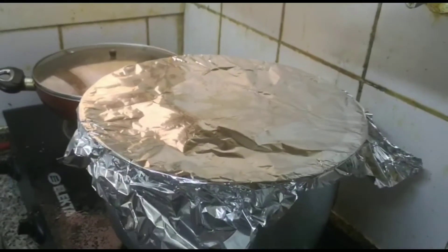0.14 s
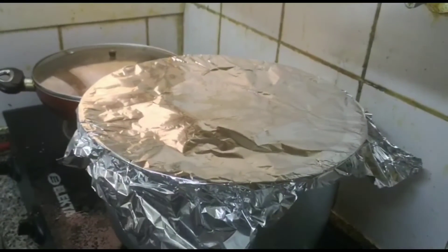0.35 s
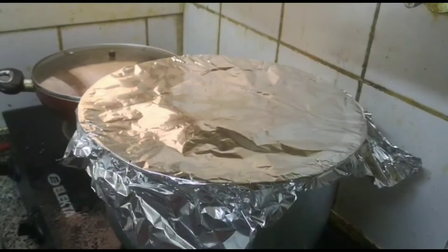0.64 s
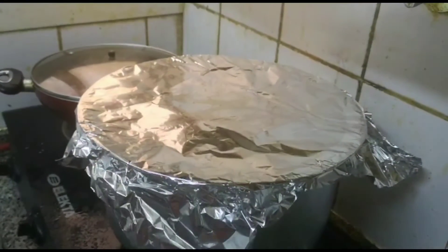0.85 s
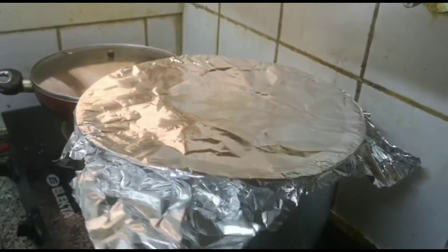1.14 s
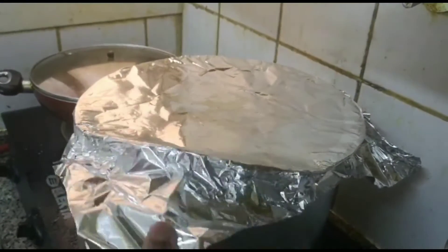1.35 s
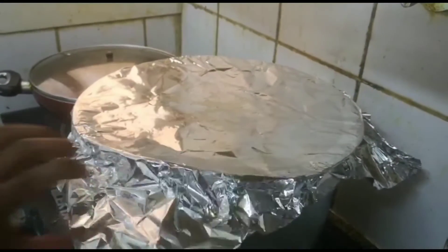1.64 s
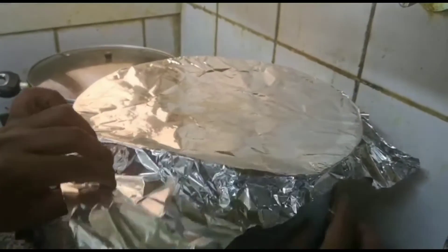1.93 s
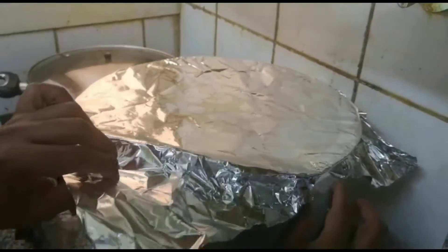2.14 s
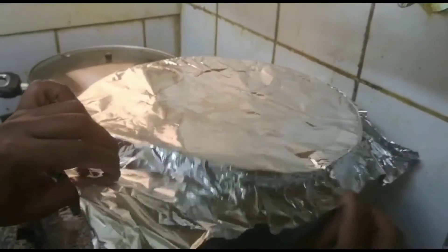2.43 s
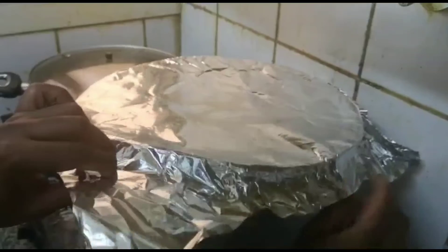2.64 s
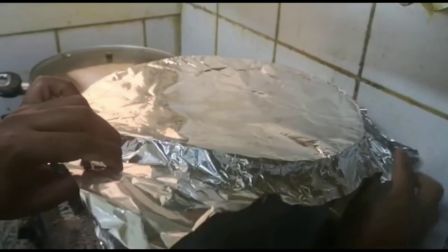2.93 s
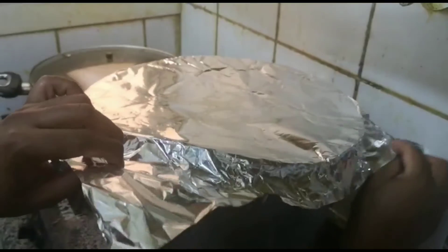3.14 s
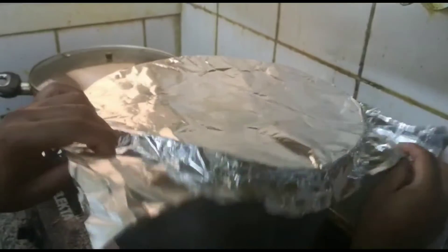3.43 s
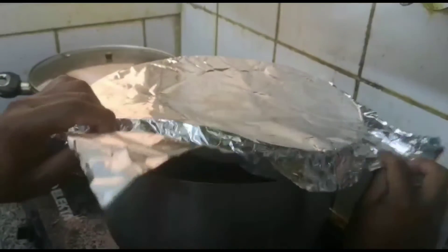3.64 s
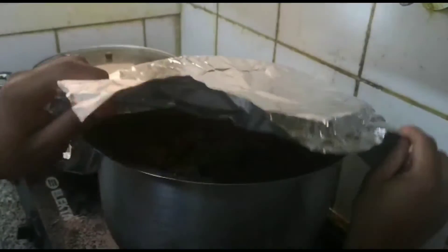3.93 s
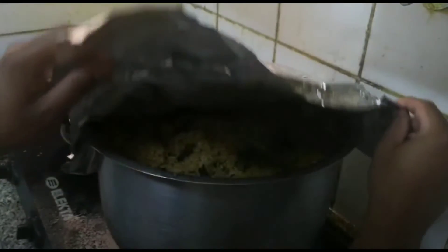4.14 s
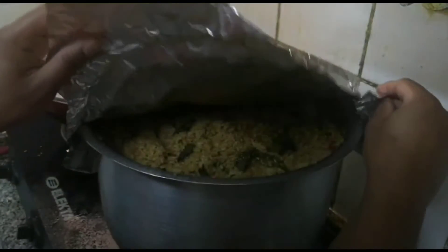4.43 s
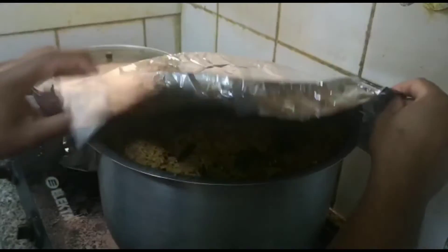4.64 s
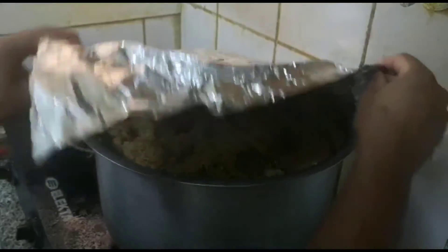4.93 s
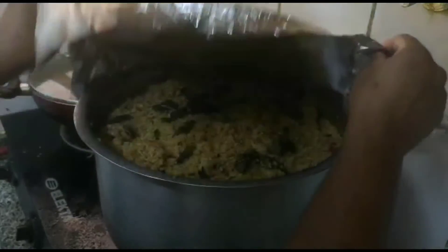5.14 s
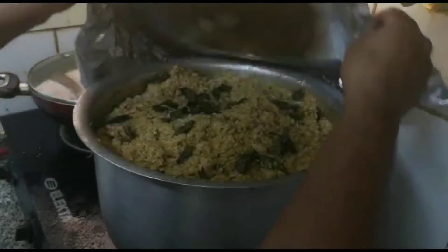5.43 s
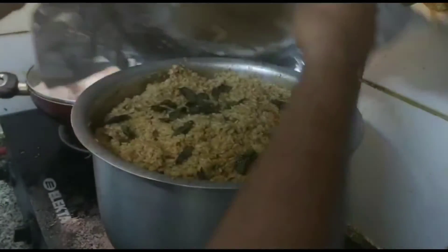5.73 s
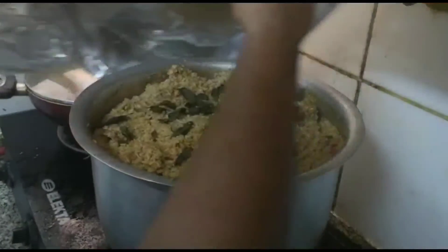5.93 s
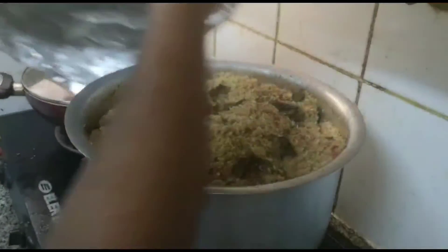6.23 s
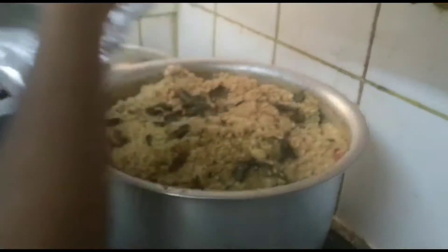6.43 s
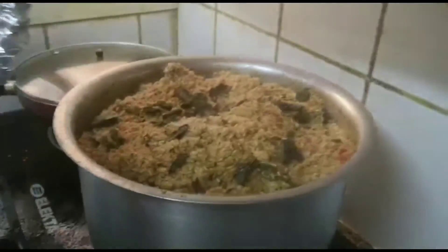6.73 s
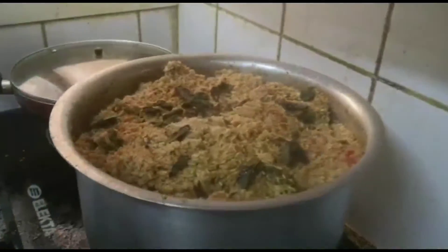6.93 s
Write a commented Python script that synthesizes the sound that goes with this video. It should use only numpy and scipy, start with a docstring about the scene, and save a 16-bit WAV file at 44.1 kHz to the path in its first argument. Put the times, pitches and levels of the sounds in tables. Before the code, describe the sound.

For the first second there is mostly background: a low pulsing engine drone heard through walls, soft rumble, steady faint hiss and a barely noticeable thin whine, with two tiny ticks near 0.2 and 0.5. At about 1.05 foil is grabbed with a sudden bright crackle, busy until 1.5, then short crinkles near 1.7. From 1.9 to 2.5 lighter tugs give small snaps, with a stronger burst at 2.6-2.8. After a near pause, dense, louder peeling runs from 3.2 to 4.1, with sharp cracks and tinny panel pops, strongest around 3.4. Finer rustling continues to 4.8, then more buckles and snaps from 4.9 to 6. Around 6.05-6.25 the freed sheet rattles hollowly. Sparse crinkles fade by 6.7, leaving drone and hiss to 7. Close stereo, leaning slightly left, brief tiled-room echo.

```python
"""Aluminium foil is peeled off a cooking pot in a tiled kitchen: creases crackle, the sheet buckles and snaps.
The foil is made of thousands of short dying tones, noisy cracks with ringing panels, and a late loose rattle;
echoes from the tiled walls are added to it. A slow engine drones through the walls: a stack of tones on its
firing rate. A thin whine, three wavering tones, and noise shaped into rumble and room hiss lie beneath."""
import sys
import numpy as np
from scipy import signal
from scipy.fft import rfft, irfft, next_fast_len
from scipy.io import wavfile
from scipy.ndimage import map_coordinates

SR = 44100
rng = np.random.default_rng(int(sys.argv[2]) if len(sys.argv) > 2 else 0)


def nominal_scale(level):
    """Amplitude ratio for a level in decibels (scalar or array-like)."""
    x = np.asarray(level, float) / 20
    return 10 ** x


def unload_wav(signal):
    """Save mono or channel-first audio to the path in sys.argv[1] as 16-bit WAV at rate SR, clipped to [-1, 1]."""
    wavfile.write(
        sys.argv[1],
        SR,
        np.round(np.clip(np.atleast_2d(signal).T, -1, 1) * 32767).astype(np.int16),
    )


N = 311787  # samples in the scene


def unit(x):
    """Scaled to rms 1."""
    return x / np.sqrt(np.mean(x ** 2) + 1e-20)


def along(points, hz):
    """Reads a curve of (frequency, value) points, with straight lines on a log frequency axis."""
    f, v = np.transpose(points)
    return np.interp(np.log(hz + 1), np.log(f + 1), v)


def wobble(rate):
    """A smooth random curve, with this many random points a second."""
    points = rng.standard_normal(int(N * rate / SR) + 4)
    return map_coordinates(points, [np.arange(N) * rate / SR])


def filtered(x, response):
    """Makes each frequency louder or softer, as the response function says."""
    m = next_fast_len(N + 8192)
    return irfft(rfft(x, m) * response(np.fft.rfftfreq(m, 1 / SR)), m)[..., :N]


# How alike noise is at left and right: (frequency [Hz], likeness [1 = the same, 0 = unrelated])
LIKENESS = [(45, 0.999), (85, 0.9), (150, 0.96), (380, 0.6), (620, 0.05), (2380, 0.0), (5980, -0.01),
            (15000, -0.01)]


def rush(spectrum):
    """Stereo noise of rms 1, alike in the bass and unrelated in the treble."""
    def response(hz):
        turn = np.arccos(np.clip(along(LIKENESS, hz), -1, 1)) / 2
        return nominal_scale(along(spectrum, hz)) * [np.cos(turn), np.sin(turn)]

    mid, side = filtered(rng.standard_normal((2, N)), response)
    return unit(np.array([mid + side, mid - side]))


def grains(spectrum, lo_hz, hi_hz, cycles, spread_db, count, size, channels):
    """Dying tones of random time, pitch and strength, dealt out over several spots; the spots sum to rms 1."""
    u = rng.random((count, 4))
    hz = lo_hz * (hi_hz / lo_hz) ** u[:, 1:2]
    turns = hz * np.arange(size) / SR
    shape = np.sin(2 * np.pi * turns) * np.exp(-turns / cycles)
    # higher grains are shorter, so they are made larger: a flat sum
    gain = hz * nominal_scale(spread_db * np.minimum(-np.log(1 - u[:, 2:3]), 4.5))
    spot = (u[:, 3:] * channels).astype(int)
    start = (u[:, :1] * N).astype(int) + spot * (N + size)
    places = start + np.arange(size)
    spots = np.bincount(places.ravel(), (gain * shape).ravel(), channels * (N + size))
    spots = filtered(spots.reshape(channels, -1)[:, :N], lambda f: nominal_scale(along(spectrum, f)))
    return spots / np.sqrt(np.mean(spots.sum(0) ** 2))


def breath_db():
    """A slow, small rise and fall in level."""
    return 0.7 * wobble(2)


# Engine tones, one for each multiple of the firing rate from the first up: (level among them [dB])
ENGINE_TONES = [-4, -20, -5, -0.5, -8, -12, 1.5, -9, -17, -14, -18, -21, -15, -16, -18, -16, -17, -24, -25,
                -25, -17]


def engine():
    """Steady multiples of the engine's firing rate, each breathing a little."""
    firing_hz, shift_db = 12.168, -37
    t = np.arange(N) / SR
    drone = np.zeros(N)
    for multiple, db in enumerate(ENGINE_TONES, 1):
        turns = multiple * firing_hz * t + rng.random()
        drone += nominal_scale(db + shift_db + breath_db()) * np.sin(2 * np.pi * turns)
    return drone


def whine():
    """One faint, thin tone whose level and phase waver."""
    hz, usual_db = 1038, -64  # level is rms
    phase = 2 * np.pi * hz * np.arange(N) / SR + wobble(10)
    return np.sqrt(2) * nominal_scale(usual_db + 4 * breath_db()) * np.sin(phase)


# Unsteady tones: (usual pitch [Hz])
WAVER_PITCHES = [45, 100, 164]
# Their swells, before a small random wobble:
# (time [s], first tone level [dB rms], second tone level [dB rms], third tone level [dB rms])
WAVER_SWELLS = [(0.1, -38.5, -47, -57), (1.3, -42, -53, -46), (1.6, -54, -43.5, -63.5),
                (5.61, -38.5, -49, -53), (6.3, -37, -47, -43), (7.07, -39, -40, -55.5)]


def wavering():
    """Tones that swell and fade and drift slightly in pitch."""
    s, *levels = np.transpose(WAVER_SWELLS)
    total = np.zeros(N)
    for hz, db in zip(WAVER_PITCHES, levels):
        turns = np.cumsum(hz * (1 + 0.0042 * wobble(6))) / SR
        swell = nominal_scale(np.interp(np.arange(N) / SR, s, db) + 1.4 * wobble(6.5))
        total += np.sqrt(2) * swell * np.sin(2 * np.pi * turns)
    return total


# Colour of the rumble: (frequency [Hz], relative level per Hz [dB])
RUMBLE_COLOUR = [(8, -37), (14, 6), (25, -41), (45, 1), (70, -3), (90, -6), (160, -6), (230, -11),
                 (270, -12.5), (330, -11.5), (430, -24), (700, -54)]


def rumble():
    """Low noise that slowly grows and shrinks."""
    return nominal_scale(-42.0 + wobble(2.2)) * rush(RUMBLE_COLOUR)


# Colour of the hiss: (frequency [Hz], relative level per Hz [dB])
HISS_COLOUR = [(260, -50), (450, -7.5), (660, -12.5), (765, -6.5), (1060, -8), (1580, -8.5), (1910, -3.5),
               (2700, -10), (4180, -20), (6600, -22), (7800, -17), (8800, -28.5), (11400, -36),
               (14200, -47), (14800, -30), (15400, -38)]


def hiss():
    """The almost steady noise of the room."""
    return nominal_scale(-49.5 + 0.059 * wobble(2.6)) * rush(HISS_COLOUR)


def duller(x):
    """The part of the crease sound under about 6500 Hz."""
    return filtered(x, lambda hz: 1 / (1 + (hz / 6500) ** 8))


GRIP_S, SETTLE_DB_PER_S = 0.016, 153  # how a pull builds up, and how fast the foil settles after it
# Pulls of the hands on the sheet: (start [s], time until it settles [s], fine creases level [dB],
# broad panels over the creases [dB], whole sheet over the creases [dB])
HAND_PULLS = [(1.045, 0.061, -53.5, -0.5, -9), (1.102, 0.097, -39.5, -4, -30), (1.231, .26, -38, -3.5, -20),
              (1.521, 0.071, -46, 1.5, -0.5), (1.642, 0.061, -51, 3.5, -20), (1.927, 0.04, -45.5, -6, -20),
              (2.015, 0.1, -48, -1, 3), (2.246, 0.08, -45.5, -0.5, -27), (2.4, 0.064, -45.5, -0.5, -10),
              (2.604, 0.051, -31, -3, -11.5), (2.707, 0.076, -35.5, -2.5, -9.5),
              (3.216, 0.035, -39.5, -2, -26), (3.288, 0.093, -34, -2.5, -10.5),
              (3.413, 0.05, -36.5, -4.5, -16), (3.517, 0.055, -34, -1, -10),
              (3.624, 0.087, -38.5, -2.5, -12.5), (3.779, 0.083, -38, -3, -14),
              (3.863, 0.05, -32.5, -3.5, -12.5), (3.95, 0.053, -38.5, -0.5, -7.5),
              (4.068, 0.055, -47, 1.5, -7), (4.17, 0.45, -43, -4.5, -18), (4.281, 0.046, -33, -11, -24),
              (4.417, 0.37, -39.5, -7.5, -15.5), (4.87, 0.05, -42.5, 0, -5.5),
              (4.917, 0.13, -37, -1.5, -15.5), (5.113, 0.12, -43.5, -1.5, -5.5),
              (5.209, 0.1, -40.5, -7.5, -14), (5.32, 0.049, -38.5, -4.5, -12), (5.473, 0.14, -47, -2, -7),
              (5.678, 0.02, -50, 3, -11), (5.787, 0.027, -39, -2, -20), (5.844, 0.11, -39.5, -4.5, -7.5),
              (6.033, 0.11, -35.5, -10, -15.5), (6.165, 0.06, -46.5, 1.5, -3.5),
              (6.251, 0.022, -45.5, -0.5, -20), (6.392, 0.03, -53.5, 3, -13),
              (6.456, 0.18, -44.5, -9, -14.5), (6.68, 0.053, -52.5, 0, -16), (6.958, 0.062, -54.5, 1, -8)]


def pulls():
    """Level of creases, panels and sheet: every pull swells in, holds and settles; overlaps add in power."""
    s, length, crinkle_db, buckle_db, flex_db = np.transpose(HAND_PULLS)[:, :, None]
    t = np.arange(0, N + 64, 64) / SR
    shape = np.clip((t - s) / GRIP_S, 0, 1) * nominal_scale(-SETTLE_DB_PER_S * np.maximum(t - s - length, 0))
    levels = [np.linalg.norm(shape * nominal_scale(crinkle_db + over_db), axis=0)
              for over_db in (0, buckle_db, flex_db)]
    # once touched, the foil never lies quite still
    levels[0] = np.hypot(levels[0], nominal_scale(-62) * (t > s[0]))
    return [np.interp(np.arange(N) / SR, t, level) for level in levels]


def strays(count):
    """Lesser snaps at random moments, louder where the hands pull harder."""
    over_crinkle_db, spread_db, ring_db = 7, 2.5, -13
    lo_hz, hi_hz = 1500, 8000  # range of their panels
    u, crinkle = rng.random((count, 3)), pulls()[0]
    s = u[:, 0] * (N - 1) / SR
    pull_db = 20 * np.log10(crinkle[(s * SR).astype(int)] + 1e-6)
    db = pull_db + over_crinkle_db - spread_db * np.log(1 - u[:, 1])
    hz = lo_hz * (hi_hz / lo_hz) ** u[:, 2]
    return [(at, level, tone, ring_db) for at, level, tone in zip(s, db, hz)]


# The clearest creases giving way, as set before the sound is coloured:
# (time [s], crack level [dB], panel pitch [Hz], panel ring against the crack [dB])
CLEAR_SNAPS = [(0.2054, -48.5, 2400, 10), (0.4898, -43.5, 5900, 3), (1.1172, -13.5, 2420, -35),
               (1.1434, -16.5, 2410, -7.5), (1.158, -18.5, 7300, -5), (1.249, -27, 7800, -12),
               (1.276, -21.5, 2380, -9), (1.3455, -23, 2880, -1), (1.3668, -18, 2280, -6),
               (1.3999, -16.5, 2330, -5.5), (1.4305, -13, 2340, -9.5), (1.5437, -31, 1390, 0.5),
               (1.624, -25, 7000, 4), (1.6616, -16.5, 2220, -12), (1.677, -21, 5030, -10),
               (1.7085, -16, 5500, -10), (1.942, -24.5, 2160, -19), (2.0302, -21.5, 1900, -10),
               (2.217, -30, 2180, -6), (2.23, -26, 1570, -13), (2.281, -16, 2210, -15),
               (2.343, -23.5, 2200, -14), (2.4405, -27.5, 4200, -4), (2.4882, -22.5, 1660, -15),
               (2.5257, -25, 2180, -11), (2.566, -21.5, 2850, -16), (2.574, -19, 1740, -19),
               (2.594, -24, 1980, -7), (2.6015, -15, 7400, -12), (2.7688, -15.5, 1870, -12),
               (3.0448, -33.5, 1630, -5.5), (3.1942, -28, 2620, -5), (3.2251, -24, 2570, -17),
               (3.3023, -23.5, 2330, 4), (3.3364, -20, 1770, -2.5), (3.3794, -11, 1740, -9),
               (3.5096, -14.5, 2630, -17), (3.5782, -18, 1810, -6.5), (3.7891, -15.5, 2010, -11),
               (3.8565, -25, 1700, 1.5), (3.897, -16.5, 2400, -5), (3.9765, -15, 2970, -10),
               (4.124, -26, 2550, -2.5), (4.1789, -21.5, 2570, -12), (4.238, -32, 7600, -10),
               (4.4034, -20, 2550, -13), (4.4225, -27, 1620, 0), (4.6405, -35, 2710, -9),
               (4.7012, -18, 2860, -18.5), (5.1678, -22, 2500, -3), (5.277, -15, 1460, -21),
               (5.348, -21, 2100, -10), (5.372, -28, 7300, -10), (5.4375, -27, 2050, -6),
               (5.5052, -23, 1860, -10), (5.548, -26, 2300, -12), (5.6973, -23, 1910, -12.5),
               (5.7649, -23.5, 1860, -12), (5.774, -17.5, 2000, -16.5), (5.86, -33.5, 1850, 4),
               (5.923, -27, 2110, 2), (6.0531, -16, 2080, -19), (6.2325, -21, 2190, -3),
               (6.4655, -23.5, 7350, -20), (6.599, -23.5, 7100, -18)]
# Colour of the creases: (frequency [Hz], relative level per Hz [dB])
CREASE_COLOUR = [(1760, -2.5), (3000, -8), (5160, -1), (6210, -1.5), (7740, 2), (10100, -12.5),
                 (12500, -14.5), (15500, -25)]


def snaps(channels):
    """A crease gives way: a sharp crack with a short rattle, and the panel beside it rings briefly."""
    ring_cycles, ring_spread = 40, 0.07  # cycles to fall 60 dB; scatter of the tones as a share of the pitch
    crack, dull, ring = np.zeros((3, channels, N + SR))
    t = np.arange(SR // 14) / SR
    # three fades, each with its own time to fall 60 dB in seconds
    rattle = 0.65 * nominal_scale(-60 * t / 0.0038) + 0.34 * nominal_scale(-60 * t / 0.02) + 0.35 * nominal_scale(-60 * t / 0.062)
    rattle = rattle * (1 - np.exp(-t / 0.00023))
    onset = 1 - np.exp(-t / 0.00096)  # the panel takes a moment to swing
    for k, (s, db, hz, ring_db) in enumerate(CLEAR_SNAPS + strays(count=140)):
        start = round(s * SR)
        at = np.s_[k % channels, start:start + len(t)]
        burst = nominal_scale(db) * rattle * rng.standard_normal(len(t))
        crack[at] += burst
        # beside a quiet panel the crack is thinner
        dull[at] += (nominal_scale(0.26 * (ring_db + 9)) - 1) * burst
        # one tone at the panel's pitch and two scattered around it
        tones = hz * (1 + ring_spread * rng.standard_normal((3, 1)) * [[0], [1], [1]])
        fade = nominal_scale(db + ring_db - 3 - 60 * t * hz / ring_cycles)
        ring[at] += fade * onset * np.sin(2 * np.pi * tones * t).sum(0)

    def colour(f):
        tiny = 1 / (1 + (1500 / (f + 1)) ** 4)  # a crease is too small to radiate low notes
        return nominal_scale(along(CREASE_COLOUR, f)) * tiny

    return filtered(crack[:, :N] + duller(dull[:, :N]), colour) + ring[:, :N]


def avalanches(rate, t60):
    """One crease sets off its neighbours: activity jumps at random and dies away, in dB about its mean."""
    jumps = (rng.random(N) < rate / SR) * rng.uniform(0, 1.07, N)
    activity = signal.lfilter([1], [1, -nominal_scale(-60 / (t60 * SR))], jumps) + 0.5
    db = 20 * np.log10(activity)
    return db - db.mean()


# Colour of the broad panels: (frequency [Hz], relative level per Hz [dB])
PANEL_COLOUR = [(760, -51), (1300, -11.5), (1750, -0.5), (2650, -0.5), (3400, -5), (4420, -7.5),
                (7480, -120)]
# Colour of the whole sheet: (frequency [Hz], relative level per Hz [dB])
SHEET_COLOUR = [(350, -40), (600, -8), (850, -6.5), (1300, -2.5), (1900, -1.5)]


def peeling():
    """Fine creases crackle in the treble, panels pop lower, the whole sheet flexes lowest; all in clumps."""
    crinkle, buckle, flex = pulls()
    clumps = avalanches(rate=90, t60=0.05)
    fine = grains(CREASE_COLOUR, 2300, 19100, cycles=2.8, spread_db=3.5, count=24000, size=64, channels=10)
    # the duller part of the creases partly follows the panels
    panel_share = (buckle / (crinkle + 1e-9) / nominal_scale(1.5)).clip(0.1, 2)
    fine = fine + (panel_share ** 0.35 - 1) * duller(fine)
    broad = grains(PANEL_COLOUR, 1100, 4280, cycles=3.0, spread_db=3.5, count=10000, size=200, channels=10)
    sheet = grains(SHEET_COLOUR, 393, 1707, cycles=3.8, spread_db=1.5, count=4000, size=500, channels=10)
    crackle = crinkle * nominal_scale(0.71 * clumps) * fine
    pops = buckle * nominal_scale(0.43 * clumps) * broad
    flexing = flex * nominal_scale(0.3 * clumps) * sheet
    return crackle + pops + flexing


# Hollow ring of the loose sheet: (frequency [Hz], relative level per Hz [dB])
LOOSE_COLOUR = [(850, -25), (1130, 0), (1500, -25), (2900, -25), (3600, -1), (4300, -30)]


def swinging():
    """Free of the pot, the sheet swings through the air and rattles in two hollow bands."""
    start_s, end_s, usual_db = 6.04, 6.27, -57.5
    t = np.arange(N) / SR
    fade = nominal_scale(-2 * SETTLE_DB_PER_S * np.maximum(t - end_s, 0))
    shape = np.clip((t - start_s) / GRIP_S, 0, 1) * fade
    rattle = grains(LOOSE_COLOUR, 900, 4000, cycles=9, spread_db=3, count=2500, size=400, channels=1)
    return nominal_scale(usual_db + 2 * wobble(25)) * shape * rattle


# How long the kitchen echoes: (frequency [Hz], time to fall 60 dB [s])
ECHO_TIMES = [(500, 0.085), (2000, 0.26), (7000, 0.2), (14000, 0.13)]


def kitchen(spots, wet_db):
    """Every spot on the sheet reaches each port directly and by its own path over the tiled walls."""
    hz, t, z = signal.stft(rng.standard_normal((2, len(spots), SR // 3)), SR, nperseg=256)
    fade = nominal_scale(-60 * t / along(ECHO_TIMES, hz)[:, None])
    tail = signal.istft(z * fade, SR, nperseg=256)[1]
    tail = nominal_scale(wet_db) * tail / np.linalg.norm(tail, axis=2, keepdims=True)
    path = np.pad(tail, ((0, 0), (0, 0), (90, 0)))
    # delays in samples; the ports lie a hand apart, so each spot is nearer to one
    lag = 8 * np.arange(len(spots))
    path[0, np.arange(len(lag)), lag] = 1
    path[1, np.arange(len(lag)), lag[::-1] + 24] = 1  # the pot stands left of centre
    return signal.fftconvolve(spots[None], path, axes=2).sum(1)[:, :N]


# Where the hands work the foil; only the change around the average counts:
# (time [s], left over right [dB])
HAND_PLACES = [(1.7, 1.5), (4.3, 2.3), (5.5, 1.5), (6.1, 2.2)]


def placed(pair):
    """Narrower in the low notes, as long waves reach both ports more alike; leans to the busier hand."""
    mid = pair[0] + pair[1]
    side = filtered(pair[0] - pair[1], lambda hz: nominal_scale(-2 / (1 + (hz / 1500) ** 4)))
    s, pan_db = np.transpose(HAND_PLACES)
    lean_db = np.interp(np.arange(N) / SR, s, pan_db - pan_db.mean())
    return np.array([mid + side, mid - side]) / 2 * nominal_scale(lean_db * [[0.5], [-0.5]])


def scene():
    """Foil in the kitchen over the engine, the whine, the wavering tones, the rumble and the hiss."""
    def thin(hz):
        return 1 / np.sqrt(1 + (720 / (hz + 1)) ** 8)  # a thin sheet radiates no bass

    sheet = filtered(peeling() + swinging() + snaps(channels=10), thin)
    foil = kitchen(sheet, wet_db=1.5)
    return placed(foil) + engine() + whine() + wavering() + rumble() + hiss()


def roll_off(x):
    """The treble ends steeply here."""
    return signal.sosfilt(signal.butter(12, 15880, fs=SR, output="sos"), x)


# Colour of the two microphone ports: (frequency [Hz], left over right [dB])
PORT_COLOUR = [(60, 0.0), (180, 0.1), (550, 1.8), (1650, 1.8), (4970, 0.6), (9000, -0.8), (15000, -3.5)]


def record(dry):
    """The two ports differ a little in colour, and the treble ends sharply at 15250 Hz."""
    def response(hz):
        return nominal_scale(along(PORT_COLOUR, hz) * [[0.5], [-0.5]]) * (hz < 15250)

    mix = filtered(dry, response)
    return roll_off(mix)


dry = scene()
out = record(dry)
unload_wav(out)
```